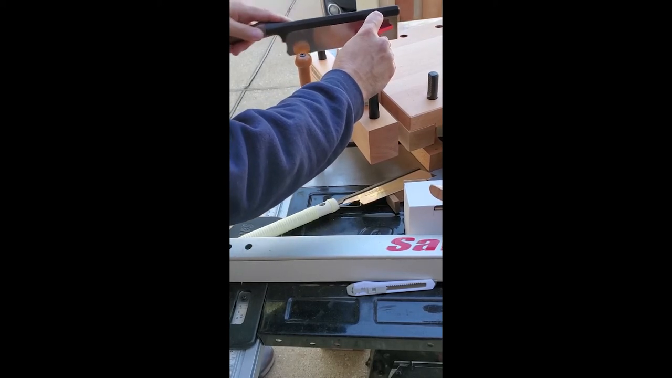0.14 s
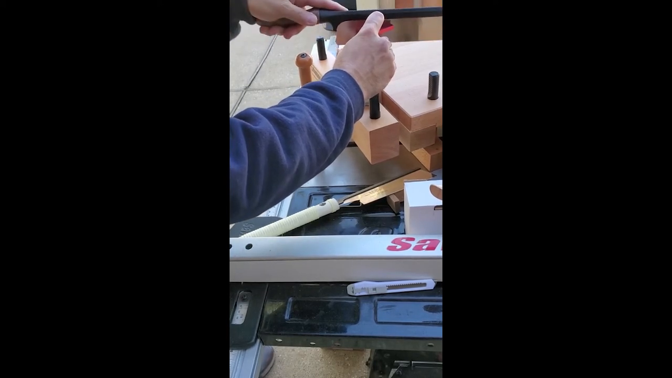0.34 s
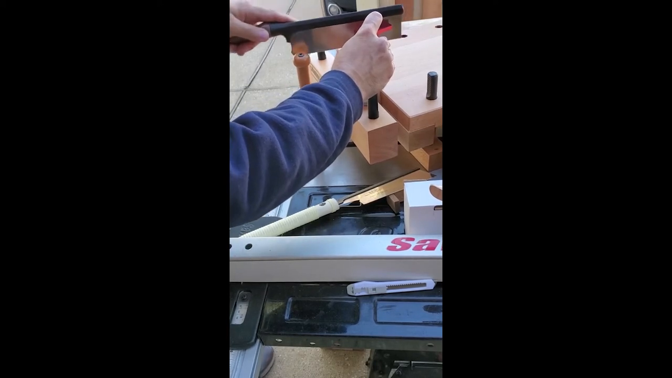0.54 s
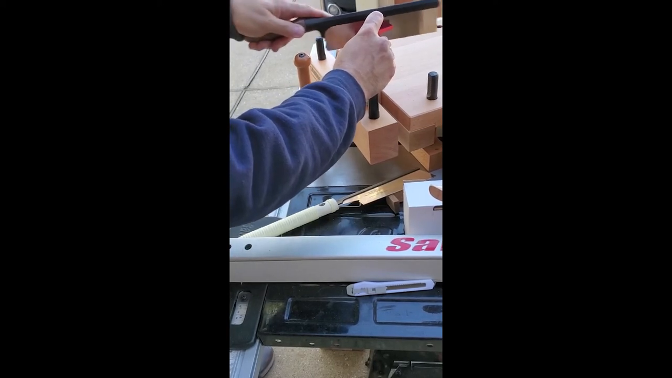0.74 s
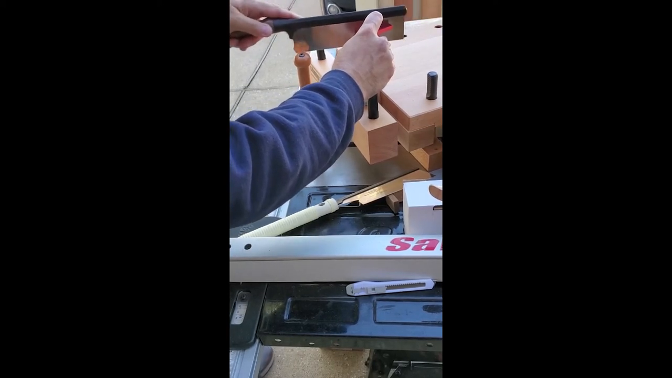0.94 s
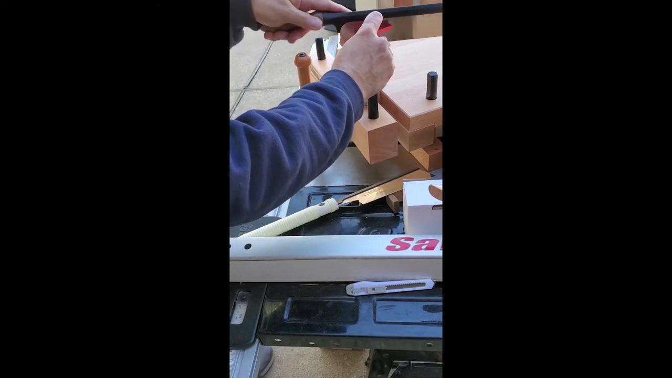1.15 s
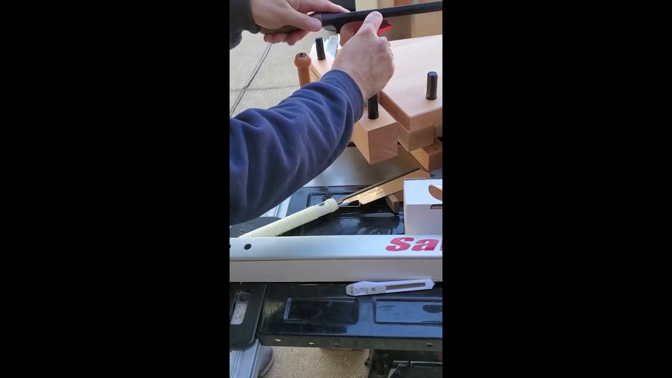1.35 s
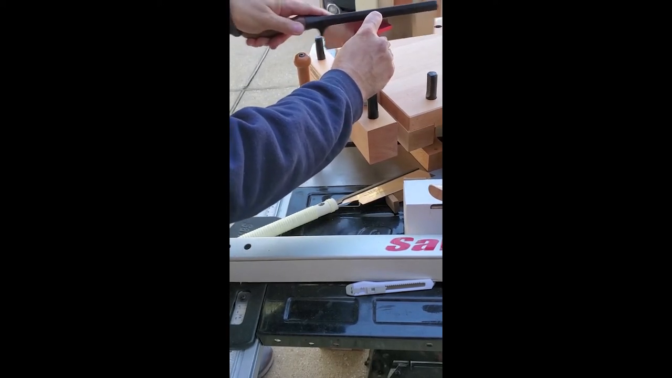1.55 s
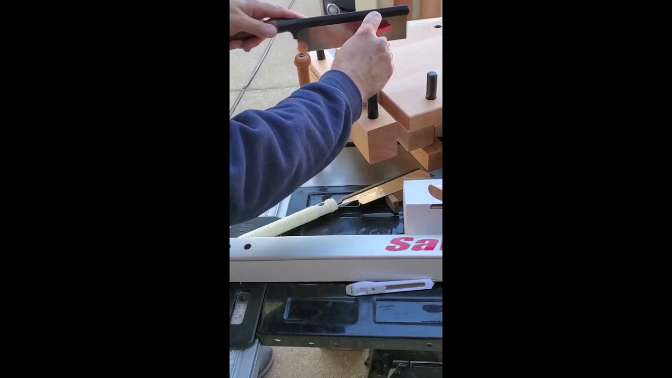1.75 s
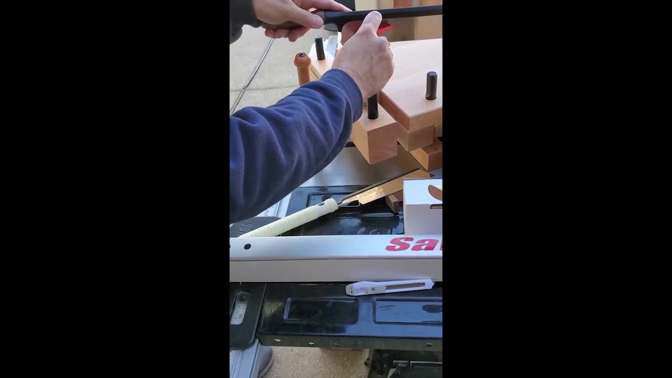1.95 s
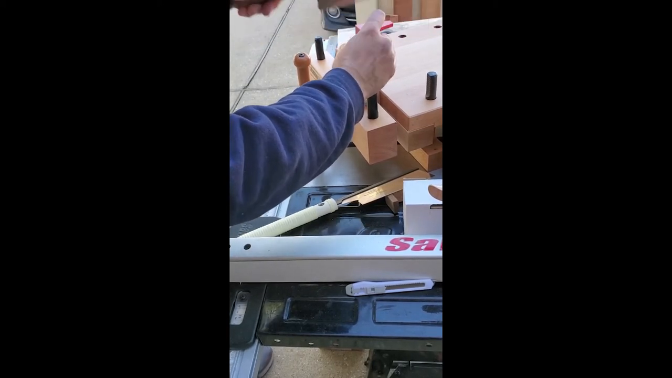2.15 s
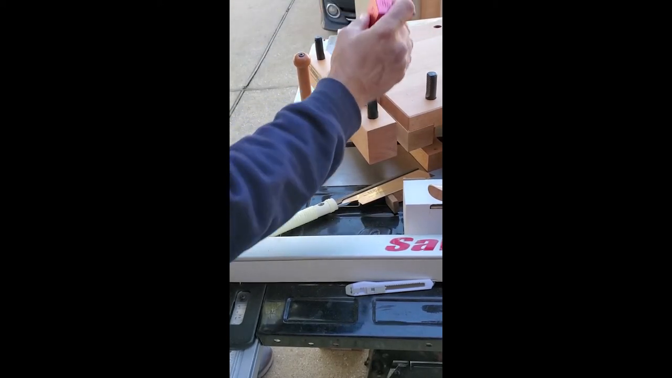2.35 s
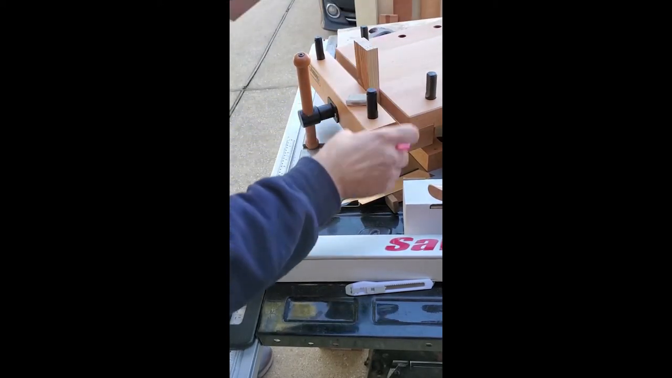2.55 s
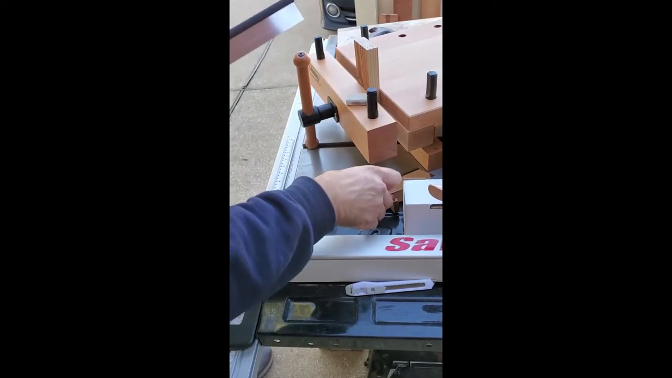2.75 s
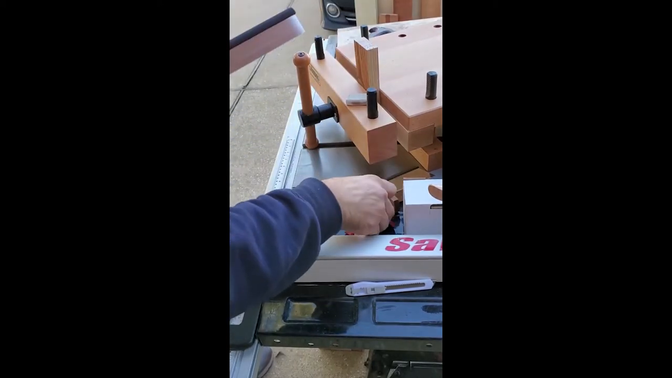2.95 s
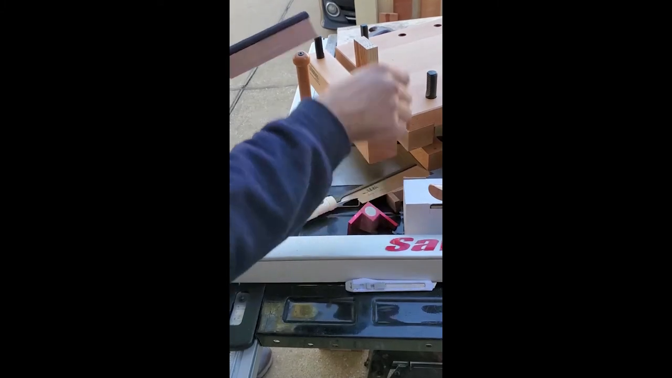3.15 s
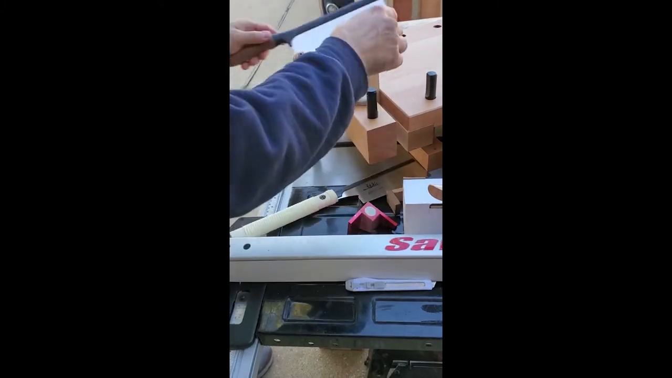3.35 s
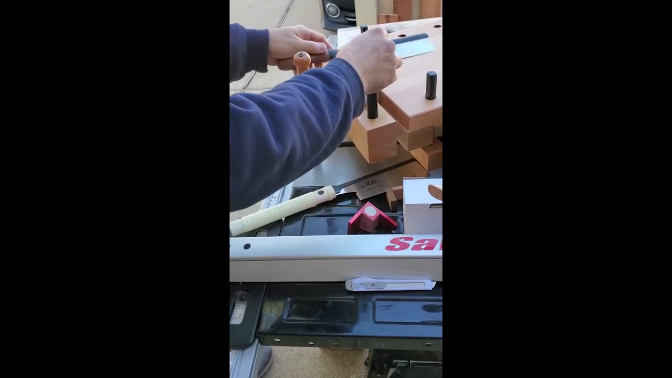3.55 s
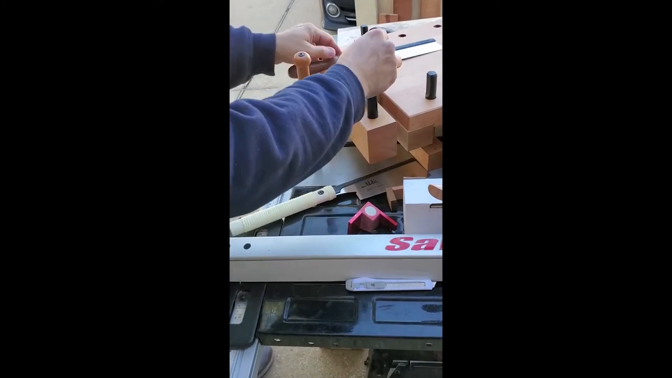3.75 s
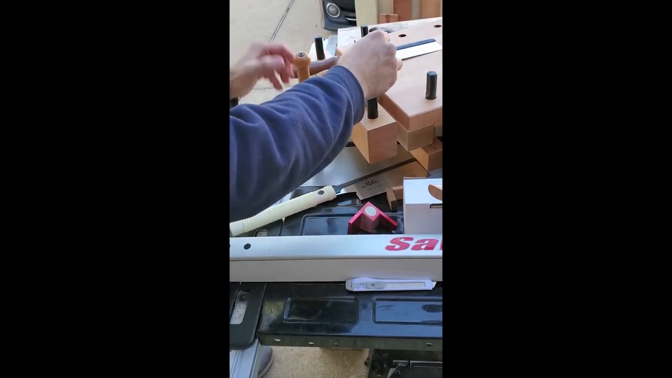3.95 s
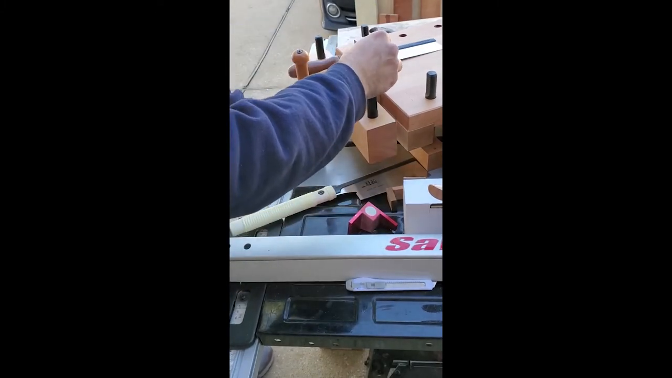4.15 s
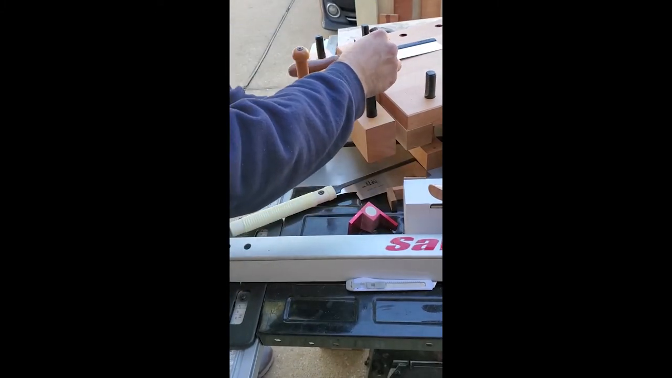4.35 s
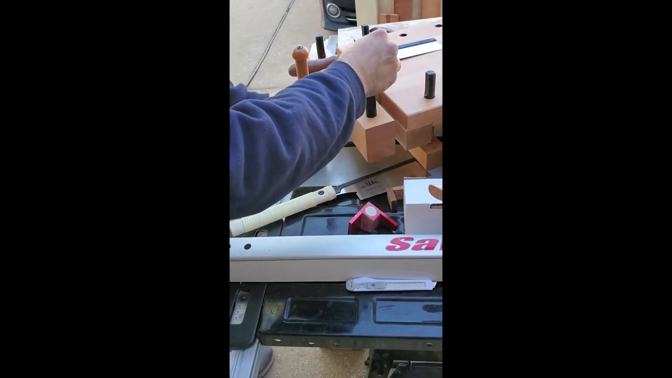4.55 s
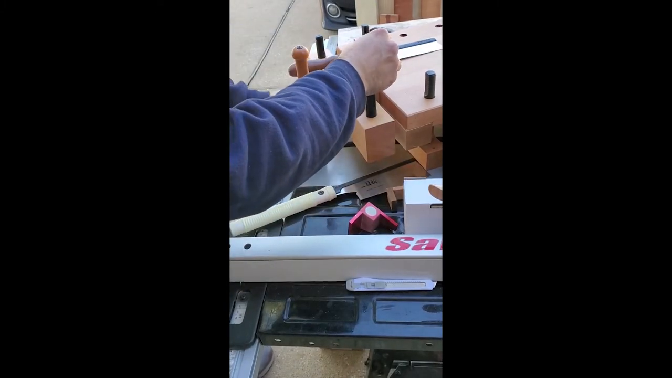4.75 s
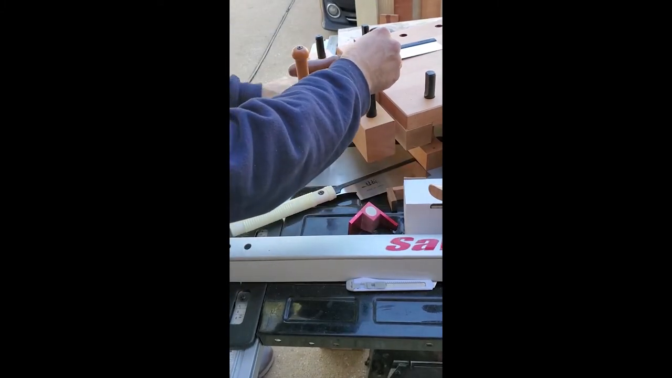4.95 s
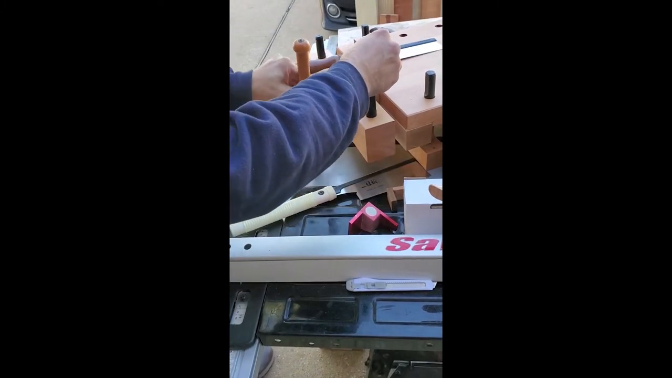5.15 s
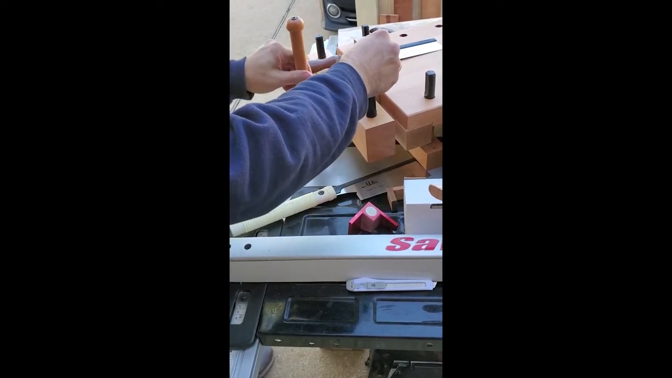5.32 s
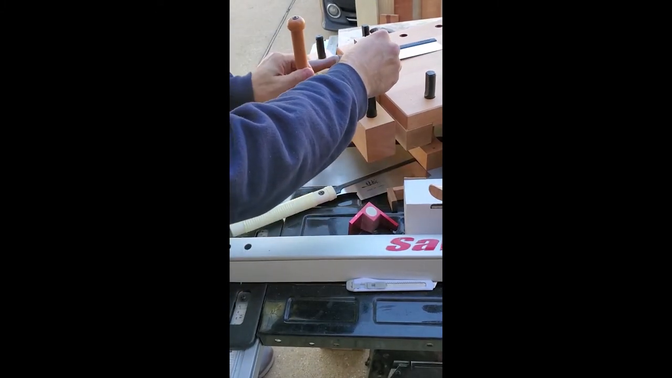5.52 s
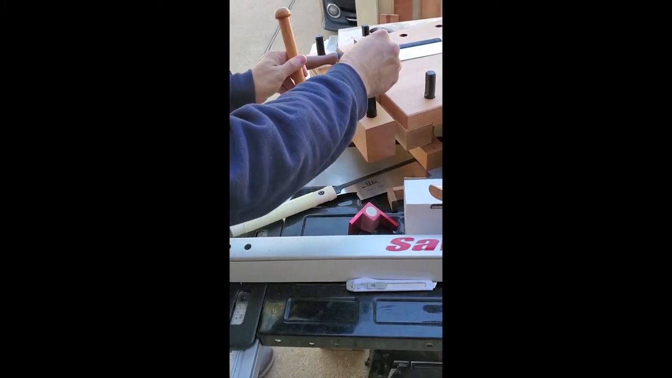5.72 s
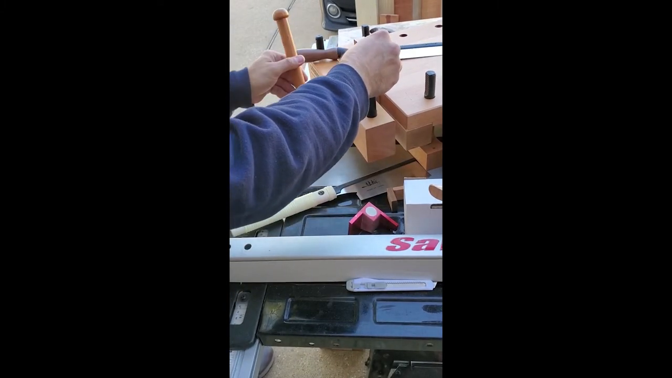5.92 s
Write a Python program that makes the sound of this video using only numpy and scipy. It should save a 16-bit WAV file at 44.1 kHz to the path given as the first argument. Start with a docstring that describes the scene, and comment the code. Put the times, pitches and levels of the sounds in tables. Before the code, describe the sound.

Short, quick strokes of a fine-toothed saw rasp on a clamped board, then a plastic block clatters onto a tray and a handle slides and knocks.

```python
"""Outdoors at a workbench, a small fine-toothed saw starts a cut in a clamped board in short quick strokes.
Teeth catching the wood ring the bench, torn fibres rasp and hiss, and some strokes briefly sing roughly.
A plastic block is dropped on a tray, rattles and ticks; later the vise handle slides and knocks.
Each blow rings a set of modes and adds a noisy crack; ticks ring short high modes.
Shaped noise makes the wind, low hum and hiss at two microphone ports; single puffs are dying sines."""
import sys
import numpy as np
from scipy import signal
from scipy.fft import rfft, irfft
from scipy.io import wavfile
from scipy.ndimage import uniform_filter1d

SR = 44100
rng = np.random.default_rng(int(sys.argv[2]) if len(sys.argv) > 2 else 0)


def boost_factor(decibels):
    """Convert a level in decibels to a linear amplitude factor."""
    exponent = np.asarray(decibels, float) / 20
    return 10 ** exponent


def wrap_up_sound(samples):
    """Save the sound to the file named by the first command line argument, as 16-bit audio."""
    columns = np.atleast_2d(samples).T
    # keep every value between -1 and 1, then stretch to whole-number steps
    tamed = np.clip(columns, -1, 1)
    steps = np.round(tamed * 32767).astype(np.int16)
    wavfile.write(sys.argv[1], SR, steps)


N = 263718   # length in samples

# saw strokes: start t/s, fastest t/s, end t/s, wood level/dB, rasp level/dB
STROKES = [(-.06, 0.009, 0.095, -23.5, -28), (.11, 0.189, 0.25, -23, -30.5), (.28, 0.379, 0.43, -26, -26.5),
           (0.472, 0.529, 0.63, -22.5, -31), (0.659, 0.714, .81, -26.5, -28.5),
           (.81, 0.881, 0.96, -22, -37), (1.041, 1.111, 1.18, -23, -31.5), (1.14, 1.21, 1.29, -32.5, -37.5),
           (1.549, 1.651, 1.763, -30.5, -35.5), (1.8, 1.894, 1.97, -29.5, -32.5),
           (2.101, 2.189, 2.25, -48.5, -51)]
# short rough singing in the rubbing: start t/s, end t/s, first f/Hz, last f/Hz, relative level/dB
SINGING = [(.14, 0.181, 255, 265, -27), (0.143, 0.201, 700, 703, -30), (0.499, 0.557, 403, 281, -22),
           (0.554, 0.607, 590, 579, -23.5), (0.634, 0.683, 574, 575, -33), (.365, .41, 994, 1820, -56),
           (0.682, 0.712, 3760, 3047, -43), (0.882, 0.92, 1640, 1660, -40), (1.092, 1.138, 418, 404, -26),
           (1.105, 1.154, 206, 212, -26.5), (1.15, 1.217, 1660, 1655, -44), (1.645, 1.737, 477, 343.6, -30),
           (1.858, 1.894, 1660, 1640, -32.5), (1.869, 1.913, 256.5, 244, -32.5),
           (1.874, 1.926, 1276, 1197, -35.5), (1.894, 1.962, 369, 363, -31.5),
           (2.15, 2.221, 410, 398.5, -43.5), (5.222, 5.291, 3400, 3210, -41.5),
           (5.245, 5.287, 1520, 1330, -36.5), (5.825, 5.87, 2607, 2595, -38.5)]
# block, board and vise handle sliding: start t/s, end t/s, wood level/dB, rasp level/dB, rasp centre f/Hz
SLIDES = [(3.134, 3.37, -29, -35.5, 2030), (3.348, 3.448, -31, -40.5, 1598), (3.39, 3.5, -25.5, -35, 1360),
          (3.489, 3.61, -42, -54, 2300), (3.622, 3.718, -61, -43, 1490), (3.728, 3.868, -45, -43.5, 3300),
          (5.166, 5.297, -37, -50.5, 1500), (5.208, 5.332, -31.5, -38.5, 1590),
          (5.241, 5.341, -30.5, -35.5, 1500), (5.304, 5.47, -30, -48.5, 1600),
          (5.784, 5.83, -38, -34.5, 2840), (5.82, 5.89, -35, -34, 2850), (5.886, 5.972, -31.5, -34.5, 3000),
          (5.957, 6.03, -32.5, -37.5, 3300)]
# blows on the wood: t/s, relative level/dB, strongest f/Hz, crack level/dB over the blow, ring shortening/dB
KNOCKS = [(0.501, -19, 370, -33, 5), (0.713, 0, 433, -19, 7), (0.727, 7.5, 740, -24, 13.5),
          (0.74, -10.5, 414.7, -21, 2), (1.098, -11, 214.1, -20, 2.5), (4.157, -29.5, 436.4, -32.5, 11.5),
          (5.2905, -8.5, 4200, -10, 10), (5.2955, -0.5, 793, -22, 11), (5.309, -12, 724, -23.5, 6),
          (5.331, -17, 760, -25, 4), (3.6232, -36, 2460, -5.5, 5), (3.7304, -27.5, 3894, -8.5, 10),
          (5.8222, -31.5, 2520, -7, 20), (5.898, -12, 905, -13.5, 9.5), (5.8985, -16, 2530, -24, 3.5)]
# the block bouncing on the tray: t/s, relative level/dB, strongest f/Hz, crack level/dB, ring shortening/dB
BOUNCES = [(2.89, 0.5, 707, -11.5, 2.8), (2.905, -1.5, 1150, -17.5, 3), (2.921, -11.5, 800, -19.5, 2),
           (2.939, -12.5, 900, -15, 5.3), (2.959, -18.5, 1307, -14, 2.9), (3.02, 3, 917, -15, 4.5),
           (3.034, -6, 700, -23, 1.5), (3.052, -22, 700, -14, 2), (3.071, -7, 1130, -13.5, 4),
           (3.089, 3, 1770, -13, 12), (3.1, -2, 367, -20, 2.5), (3.119, -7.5, 1143, -14, 11),
           (3.149, -14, 800, -16, 2.5), (3.175, -19.5, 900, -14.5, 4)]
# loose parts ticking: t/s, relative level/dB
TICKS = [(2.3218, -31.5), (3.254, -26), (3.3143, -25.5), (3.3523, -26), (3.3694, -36), (3.3926, -28.5),
         (3.4185, -27), (3.4488, -23), (3.495, -41), (3.5061, -28), (3.519, -35.5), (3.5583, -36.5),
         (3.693, -33.5), (4.212, -63.5), (4.5052, -52), (4.5894, -48), (4.9094, -48)]
# resonances of the bench, before any damping: f/Hz, relative level/dB, time to fall 60 dB t/s
BENCH_MODES = [(214.2, -11.5, 0.26), (255, -9.5, 0.36), (360.7, 2, 0.06), (410, -1.5, 0.23),
               (453.4, -2.5, 0.095), (524, -8, 0.16), (582, -6, 0.085), (700, -1.5, 0.13), (778, -4.5, 0.1),
               (899, -15.5, 0.11), (950, -14.5, .07), (1205, -16.5, 0.34), (1430, -14.5, 0.2),
               (1660, -7.5, 0.16), (2260, -14.5, 0.14), (2600, -11.5, 0.032), (2965, -12.5, 0.019),
               (3525, -12, 0.023), (4100, -16, 0.0082), (4810, -20, 0.04), (1950, -6.5, 0.055)]
# resonances of the tray, before any damping: f/Hz, relative level/dB, time to fall 60 dB t/s
TRAY_MODES = [(372.7, -5.5, 0.15), (700.6, -6, 0.42), (726.2, -13.5, .25), (759, -11, 0.43),
              (846.5, -10.5, 0.18), (1150, -6, 0.14), (1273, -6, 0.06), (1520, -19.5, 0.12),
              (1655, -4.5, 0.12), (1736, -12.5, 0.097), (2022, -14.5, 0.11), (2130, -22, 0.11),
              (2520, -18.5, .2), (2730, -15, 0.36), (3016, -3, 0.14), (3290, -20, 0.23), (3860, -21, .12),
              (4770, -20.5, 0.05)]
# resonances of a tick: f/Hz, relative level/dB, time to fall 60 dB t/s
TICK_MODES = [(3030, 1.5, 0.0068), (4480, -9.5, 0.0022), (6050, -9, 0.0058), (7200, -15, 0.0024),
              (8400, -2.5, 0.0038), (11500, -16.5, 0.0024)]
# colour of the hiss of torn fibres: f/Hz, relative level/dB
FIBRE_HISS = [(2650, -9), (4500, 1.5), (5330, -1.5), (6770, 0.5), (7820, -7.5), (8730, -4), (11300, -5),
              (14800, -7.5)]
# colour of the clatter in each blow: f/Hz, relative level/dB
CLATTER = [(120, -52.5), (200, -10.5), (568, -8.5), (718, 2), (976, -15), (1640, -14), (1900, -12.5),
           (2820, -16.5), (7330, -49.5), (11100, -54), (14800, -88)]
# how the ports hear the bench, left over right: f/Hz, level/dB
BENCH_SIDE = [(60, 4), (200, 12.5), (300, 7.5), (380, -13.5), (700, -0.5), (1290, 3), (4400, 8), (15000, 2)]
# how far the left port leads for the bench: f/Hz, phase/rad
BENCH_LEAD = [(100, 0.52), (220, 0.84), (430, 2.18), (780, 1.2), (1460, 1.43), (3620, 6.72), (8790, 10.8),
              (11100, 24.1), (15200, 33)]
# how the ports hear the tray, left over right: f/Hz, level/dB
TRAY_SIDE = [(60, 6.5), (180, -9.5), (550, -12.5), (1650, 3), (4970, 4), (15000, -1)]
# how far the left port leads for the tray: f/Hz, phase/rad
TRAY_LEAD = [(100, 1.97), (1290, 1.24), (2330, -0.5), (15000, -23)]
# scatter from walls, floor and clutter, near then far: time to fall 60 dB t/s, treble cut f/Hz, level/dB
YARD = [(.22, 7010, -10.5), (0.799, 1507, -23.5)]
# slow course of the wind: t/s, level/dB, left over right level/dB
GUSTS = [(0, -51, 25), (.43, -50, 25), (.66, -29.5, 8), (.98, -48.5, 26.5), (1.28, -55, 18), (1.6, -49, 8),
         (2.03, -58.5, 34.5), (2.27, -43.5, -0.5), (2.8, -42.5, -9), (3.06, -37.5, 9.5), (3.4, -60, 20),
         (3.93, -47, 3), (4.23, -44, -11), (4.6, -41.5, -5), (5.16, -43, 5.5), (5.36, -51.5, 37),
         (5.59, -34, -11), (5.85, -50.5, 32), (5.98, -33, 7)]
# colour of the wind: f/Hz, relative level/dB
WIND = [(12, -35.5), (20, -4.5), (81, 5.5), (200, -9.5), (221, -9.5), (253, -2.5), (300, -20), (390, -44.5),
        (660, -120)]
# single wind puffs: t/s, relative level/dB, f/Hz, left over right level/dB
PUFFS = [(0.619, -26, 102, -7), (0.659, -6, 110, 5), (0.678, -20, 72, 11), (3.651, -33.5, 99.6, 7),
         (3.7, -29, 84.8, 5), (3.889, -35, 74.4, 0), (4.289, -29, 81.7, 7), (4.519, -30, 96, 0),
         (5.139, -34, 56.5, -6), (5.484, -20.5, 63.5, 8), (5.601, -18, 64.6, -3), (5.659, -19, 88, -9),
         (5.699, -15.5, 57, 5), (5.759, -37.5, 43.1, 35)]
# slow course of the hum, which the port hiss follows: t/s, hum level/dB
BACKGROUND = [(0, -39), (.7, -39.5), (1.28, -47), (1.85, -43.5), (2.05, -43.5), (2.3, -42.5), (2.9, -43.5),
              (3.25, -49), (3.5, -47.5), (3.62, -57.5), (3.76, -45), (3.9, -56.5), (4.3, -55), (4.4, -49),
              (5.16, -46), (5.78, -45), (5.83, -39.5), (5.98, -40)]
# colour of the hum: f/Hz, relative level/dB
HUM = [(88, -47.5), (150, -2.5), (253, 5.5), (333, 0.5), (617, -1.5), (1470, -14.5), (1780, -12.5),
       (2100, -27.5), (4000, -25), (5200, -63), (8800, -120)]
# colour of the port hiss: f/Hz, relative level/dB
PORT_HISS = [(1180, -35), (2000, 1.5), (6570, -2), (6970, -2), (7450, -18.5), (7960, -4), (9030, -3.5),
             (14000, -2), (14800, -26)]

TIME = np.arange(N) / SR
HZ = np.maximum(np.fft.rfftfreq(N, 1 / SR), 1)   # frequency bins of the whole scene


def unit(x):
    """Scale to rms 1."""
    return x / np.sqrt(np.mean(x ** 2) + 1e-20)


def in_time(rows):
    """Columns of a curve at every sample."""
    s, *columns = np.transpose(rows)
    return [np.interp(TIME, s, c) for c in columns]


def at_hz(points):
    """A spectrum table at every frequency bin."""
    hz, value = np.transpose(points)
    return np.interp(np.log(HZ), np.log(np.maximum(hz, 20)), value)


def colour(x, spectrum):
    """Give x the spectrum, silent outside its ends; rms 1."""
    inside = (HZ > spectrum[0][0]) & (HZ < spectrum[-1][0])
    return unit(irfft(rfft(x) * boost_factor(at_hz(spectrum)) * inside, N))


def drift(rate):
    """Random wandering: straight lines between random points of spread 1, 2 * rate points a second."""
    knots = rng.standard_normal(int(N / SR * rate * 2) + 2)
    return np.interp(TIME * rate * 2, np.arange(len(knots)), knots)


def die_away(clicks, t60):
    """Each click falls by 60 dB in t60 seconds."""
    return signal.lfilter([1], [1, -boost_factor(-60 / (t60 * SR))], clicks + 1e-18)


def ring(clicks, hz, t60):
    """A unit click sets a dying sine of starting height 1 ringing."""
    r, w = boost_factor(-60 / (max(t60, .003) * SR)), 2 * np.pi * hz / SR
    return signal.lfilter([0, np.sin(w)], [1, -2 * r * np.cos(w), r * r], clicks + 1e-18)


def nearness(hz, centre_hz, octaves, lift_db):
    """Modes near the centre of the excitation are lifted, in dB."""
    return lift_db * np.exp(-(np.log2(hz / centre_hz) / octaves) ** 2)


def speed(start, fastest, end):
    """A pass speeds up to 1 and slows to rest."""
    return np.sin(np.pi / 2 * np.interp(TIME, [start, fastest, end], [0, 1, 0]))


def passes(rows, sweep_octaves, wood_early, wood_power, rasp_power, linger_s):
    """Motion of all passes: wood may peak before full speed and lingers; rasp follows speed and falls in pitch."""
    pace, rasp_hz, wood, rasp = 0, np.ones(N), 0, 0
    for start, fastest, end, wood_db, rasp_db, hz in rows:
        v = speed(start, fastest, end)
        early = speed(start, fastest - wood_early * (fastest - start), end)
        # the contact point travels, so the rasp centre sinks
        sweep = sweep_octaves * np.interp(TIME, [start, end], [.5, -.5])
        rasp_hz = np.where((TIME >= start) | (rasp_hz == 1), hz * 2 ** sweep, rasp_hz)
        pace = np.maximum(pace, v)
        wood = wood + boost_factor(wood_db) * early ** wood_power
        rasp = rasp + boost_factor(rasp_db) * v ** rasp_power
    r = np.exp(-1 / (linger_s * SR))
    wood = signal.lfilter([1 - r], [1, -r], wood, zi=[wood[0]])[0]
    return pace, rasp_hz, wood, rasp


def rubbing(motion, slow_per_s, fast_per_s, hiss_db, jitter, uneven_db, grit_db):
    """Almost regular catches ring the bench; torn fibres rasp and hiss with each catch."""
    pace, rasp_hz, wood_gain, rasp_gain = motion
    per_s = slow_per_s + (fast_per_s - slow_per_s) * pace
    travel = np.cumsum(per_s * (1 + jitter * drift(150.0))) / SR   # catches so far
    catches = np.diff(np.floor(travel), prepend=0) * boost_factor(uneven_db * drift(120.0))
    noise = rng.standard_normal(N)
    grit = noise * boost_factor(grit_db * drift(300.0) + 4.4 * np.cos(2 * np.pi * travel))
    wood, rasp = 0, 0
    for hz, db, t60 in BENCH_MODES:
        if hz < 1000:   # low modes sing when the catch rate passes near them
            mode_db = db + nearness(hz, per_s, 0.95, 14.0) + 3.8 * drift(18.0)
            wood = wood + unit(ring(catches, hz, t60 * 0.5)) * boost_factor(mode_db)
        else:   # the contact point picks out the high modes
            mode_db = db + nearness(hz, rasp_hz, 0.27, 10.0) + 7.8 * drift(25.0)
            rasp = rasp + unit(ring(grit, hz, t60 * 0.19)) * boost_factor(mode_db)
    # even out both over about 40 ms, so that the gains set the level
    wood, rasp = (x / np.sqrt(uniform_filter1d(x ** 2, size=1800) + 1e-12) for x in (wood, rasp))
    hiss = colour(grit, FIBRE_HISS)
    return wood_gain * wood + rasp_gain * (rasp + boost_factor(hiss_db) * hiss)


def sawing():
    """Saw teeth rub the board; shorter strokes rasp higher."""
    mid_rasp_hz, usual_stroke_s, rasp_follows = 2110, .18, .8   # rasp falls as a power of stroke length
    rows = []
    for start, fastest, end, wood_db, rasp_db in STROKES:
        rasp_hz = mid_rasp_hz * (usual_stroke_s / (end - start)) ** rasp_follows
        rows.append((start, fastest, end, wood_db, rasp_db, rasp_hz))
    motion = passes(rows, sweep_octaves=.6, wood_early=0.78, wood_power=1.7, rasp_power=2.0, linger_s=0.017)
    return rubbing(motion, 300, 460, hiss_db=-8.0, jitter=.4, uneven_db=3.5, grit_db=1.5)


def singing():
    """Catches lock onto one resonance: short, rough, gliding tones, each a narrow noisy band."""
    out, waver, throb = np.zeros(N), drift(450.0), drift(60.0)
    for start, end, first_hz, last_hz, db in SINGING:
        i, j = int(start * SR), int(end * SR)
        # a fast random waver, as a share of the pitch, roughens the tone
        hz = np.linspace(first_hz, last_hz, j - i) * (1 + .055 * waver[i:j])
        swell = np.sin(np.linspace(0, np.pi, j - i)) ** 0.23 * boost_factor(2.8 * throb[i:j])
        out[i:j] += boost_factor(db + 5.0) * swell * np.sin(2 * np.pi * np.cumsum(hz) / SR)
    return out


def sliding_parts():
    """Block, board and vise handle start with a jolt, then slow down as they rub."""
    jolt = .07   # share of a slide spent speeding up
    rows = [(s, s + jolt * (end - s), end, *rest) for s, end, *rest in SLIDES]
    motion = passes(rows, sweep_octaves=.2, wood_early=0, wood_power=1.45, rasp_power=2.2, linger_s=0.013)
    return rubbing(motion, 450, 580, hiss_db=-11.5, jitter=.4, uneven_db=1.5, grit_db=5.5)


def struck(events, modes, spread_db, ring_db, crack_s, tail_db, tail_s, choke_db_per_s):
    """Each blow rings every mode until the next contact chokes it, with a dry crack and a duller clatter."""
    out, crack = np.zeros(N), np.zeros(N)
    chance = rng.standard_normal((len(events), len(modes), 2))
    hz, db, t60 = np.transpose(modes)[:, :, None]
    t = np.arange(int(.4 * SR)) / SR
    for (s, peak_db, centre_hz, crack_db, damp_db), luck in zip(events, chance):
        i = int(s * SR)
        start_db = peak_db + ring_db + db + nearness(hz, centre_hz, 0.59, 10.55) + spread_db * luck[:, :1]
        detuned = hz * (1 + 0.0054 * luck[:, 1:])   # the load on the body shifts a little between blows
        until_next = min((row[0] - s for row in events if row[0] > s), default=1)
        choke_db = choke_db_per_s * np.maximum(t - until_next, 0)
        decay_db = 60 * t * boost_factor(damp_db) / t60
        rings = boost_factor(start_db - choke_db - decay_db) * np.sin(2 * np.pi * detuned * t)
        rings *= np.minimum(t * hz / 1.2, 1)   # low modes build up more slowly
        rings *= np.sign(np.sin(9 * luck[:, :1]))   # either way round
        out[i:i + len(t)] += rings.sum(axis=0)[:N - i]
        crack[i] = boost_factor(peak_db + crack_db)
    clatter = colour(rng.standard_normal(N), CLATTER)
    bright = unit(signal.lfilter([1, -1.8, .81], [1], clatter))
    snap = unit(signal.lfilter([1, -1], [1], bright))   # the very first contact is the brightest
    out += die_away(crack, crack_s) * bright
    out += boost_factor(-24.0) * die_away(crack, 0.011) * snap
    return out + boost_factor(tail_db) * die_away(crack, tail_s) * clatter


def knocks():
    """Blows on the wood ring the bench."""
    return struck(KNOCKS, BENCH_MODES, spread_db=0.0, ring_db=-10.0, crack_s=0.037,
                  tail_db=3.0, tail_s=0.063, choke_db_per_s=148.5)


def block_on_tray():
    """The plastic block bounces and rings the tray."""
    return struck(BOUNCES, TRAY_MODES, spread_db=2.5, ring_db=-11.0, crack_s=0.035,
                  tail_db=-1.5, tail_s=0.18, choke_db_per_s=501.0)


def ticks():
    """Tiny hard contacts ring a few short high modes."""
    s, level_db = np.transpose(TICKS)
    chance, out = rng.standard_normal((len(s), len(TICK_MODES))), np.zeros(N)
    for (hz, db, t60), luck in zip(TICK_MODES, chance.T):
        clicks = np.zeros(N)
        clicks[(s * SR).astype(int)] = boost_factor(level_db + db - 1.5 + 4.0 * luck)
        out += ring(clicks, hz, t60)
    return out


def to_ports(x, side_db, lead):
    """Two ports a few centimetres apart: level and phase differ by frequency."""
    half = boost_factor(at_hz(side_db) / 2) * np.exp(.5j * at_hz(lead))
    return irfft(rfft(x) * np.array([half, 1 / half]), N)


def yard(x):
    """Walls, floor and clutter: dull dying scatter, different at each port."""
    t, tail = np.arange(SR) / SR, 0
    for t60, cut_hz, db in YARD:
        part = rng.standard_normal((2, len(t))) * boost_factor(-60 * t / t60) * (t > .0015)
        part = signal.sosfilt(signal.butter(1, cut_hz, fs=SR, output="sos"), part)
        tail = tail + boost_factor(db) * part / np.sqrt(np.sum(part ** 2, axis=1, keepdims=True))
    return signal.fftconvolve(x[None], tail, axes=1)[:, :N]


def port_noise(share):
    """Noise at the two ports, partly shared and partly each port's own."""
    white = rng.standard_normal((3, N))
    return share * white[2] + np.sqrt(1 - share ** 2) * white[:2]


def wind():
    """Lumpy low noise, partly its own at each port."""
    wind_db, pan_db = in_time(GUSTS)
    lumps_db = 0.39 * drift(20.0) + 2.2 * np.array([drift(1.5), drift(20.0)])
    sides_db = np.array([pan_db, -pan_db]) / 2
    return boost_factor(wind_db + lumps_db + sides_db) * colour(port_noise(.6), WIND)


def puffs():
    """Each wind puff pushes the ports in three swings that swell and die."""
    out = np.zeros((2, N))
    for s, level_db, hz, side_db in PUFFS:
        t = np.arange(int(3 / hz * SR)) / SR
        push = np.sin(2 * np.pi * hz * t) * (t * hz) * np.exp(-2.2 * t * hz) * 4.0
        i = int(s * SR)
        out[:, i:i + len(t)] += boost_factor(level_db + np.array([[side_db], [-side_db]]) / 2) * push
    return out


def hum_and_hiss():
    """Low hum and port hiss, both shaped noise, swell and sink together; the hum also flickers."""
    below_hum_db, follows = 9, 1.03   # follows: dB of hiss swing per dB of hum swing
    hum_db, = in_time(BACKGROUND)
    mean_db = hum_db.mean()
    hiss_db = mean_db - below_hum_db + follows * (hum_db - mean_db)
    hum = boost_factor(hum_db + 2.4 * drift(11.0) + np.array([[-.3], [.3]])) * colour(port_noise(.6), HUM)
    hiss = boost_factor(hiss_db + np.array([[1.8], [-1.8]])) * colour(port_noise(.05), PORT_HISS)
    return hum + hiss


def scene():
    """Bench and tray sources at the two ports, with the yard, wind, hum and hiss."""
    bench = sawing() + singing() + sliding_parts() + knocks()
    tray = block_on_tray() + ticks()
    near = to_ports(bench, BENCH_SIDE, BENCH_LEAD) + to_ports(tray, TRAY_SIDE, TRAY_LEAD)
    return near + yard(bench + tray) + wind() + puffs() + hum_and_hiss()


def roll_off(x):
    """The treble ends steeply here."""
    return signal.sosfilt(signal.butter(12, 15620, fs=SR, output="sos"), x)


def record(dry):
    """The loudest blows overload the input, and the lowest bass is cut."""
    loud = np.tanh(dry * (1 + dry ** 2 * 0.82))
    cut = signal.sosfilt(signal.butter(2, 33, "high", fs=SR, output="sos"), loud)
    return roll_off(np.clip(cut, -1, 1))


dry = scene()
out = record(dry)
wrap_up_sound(out)
```